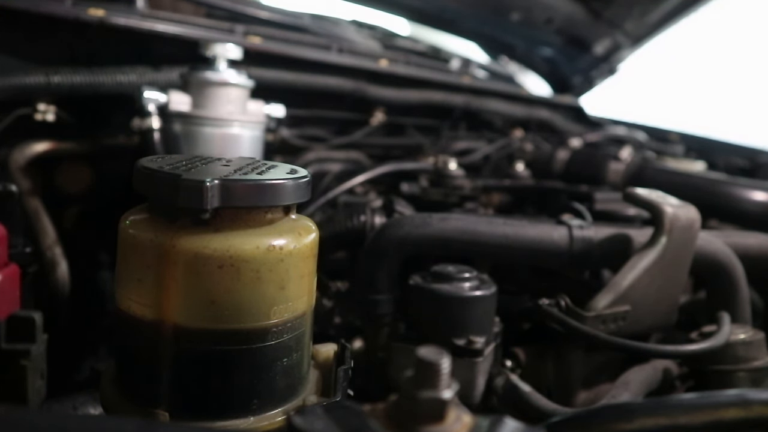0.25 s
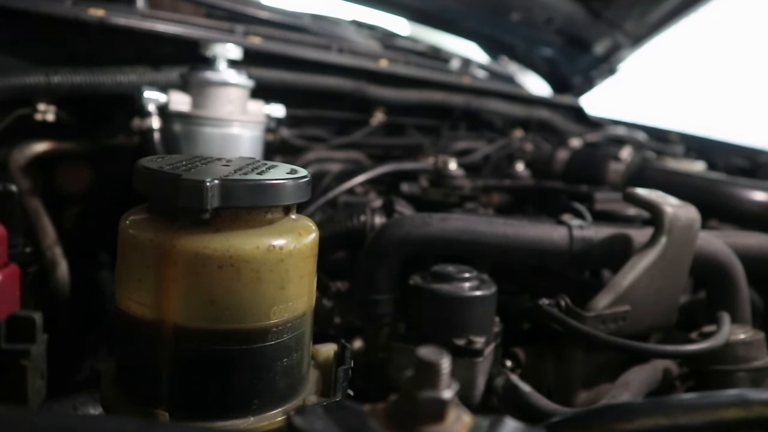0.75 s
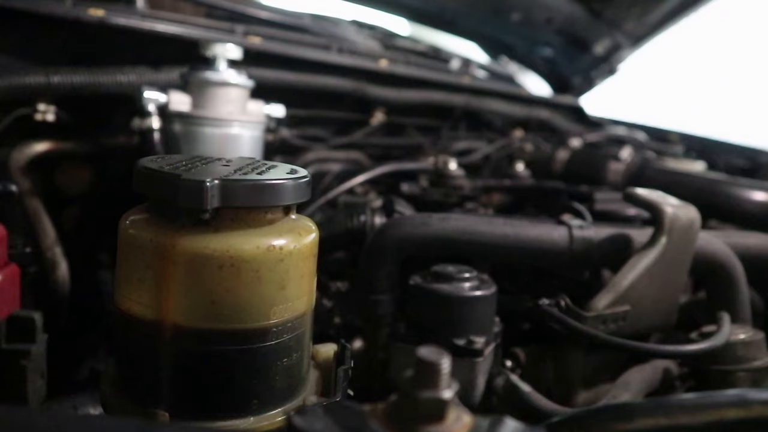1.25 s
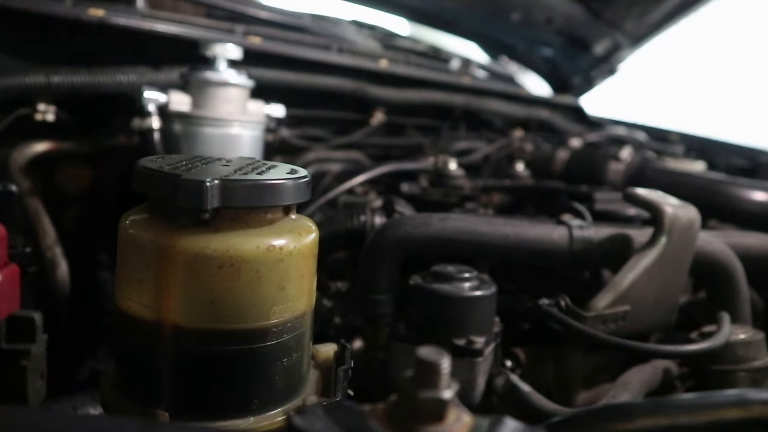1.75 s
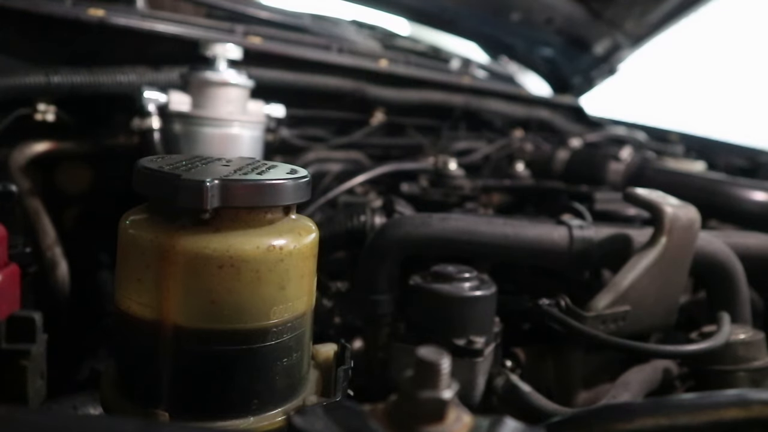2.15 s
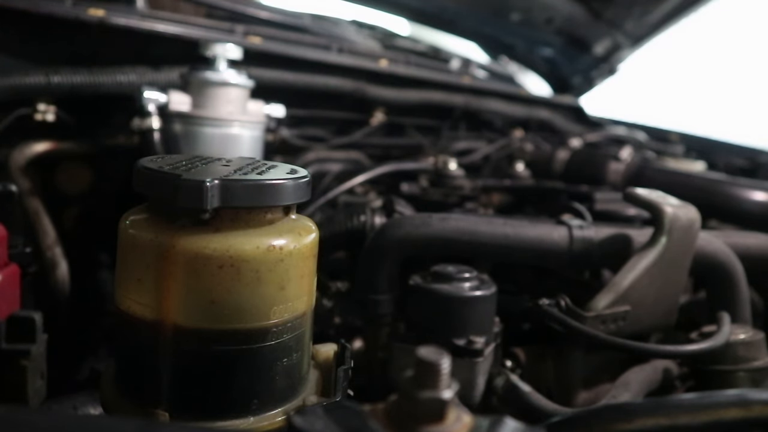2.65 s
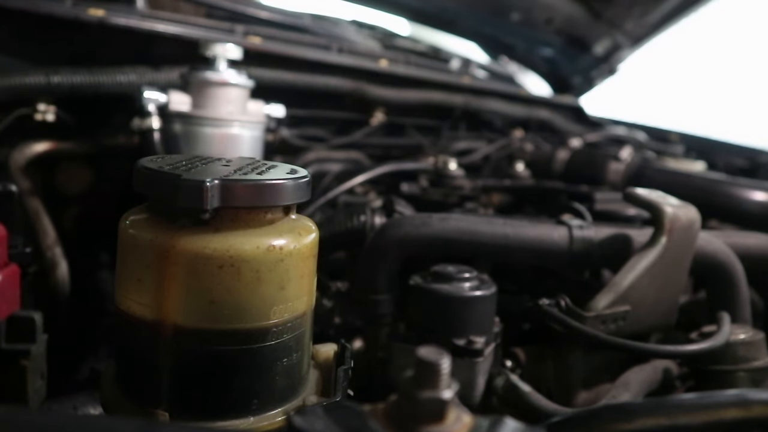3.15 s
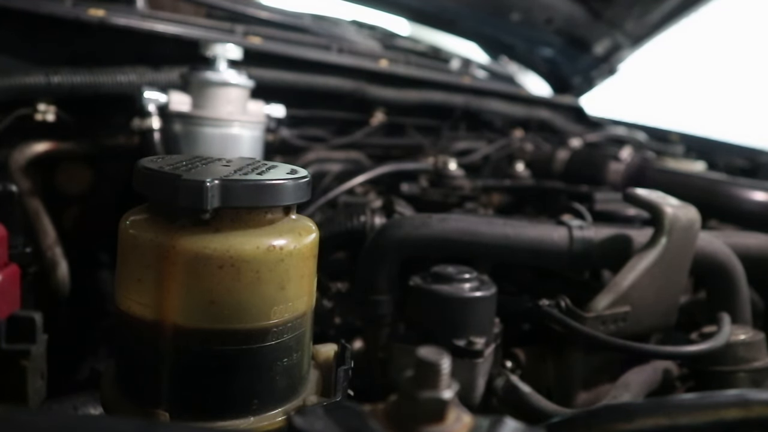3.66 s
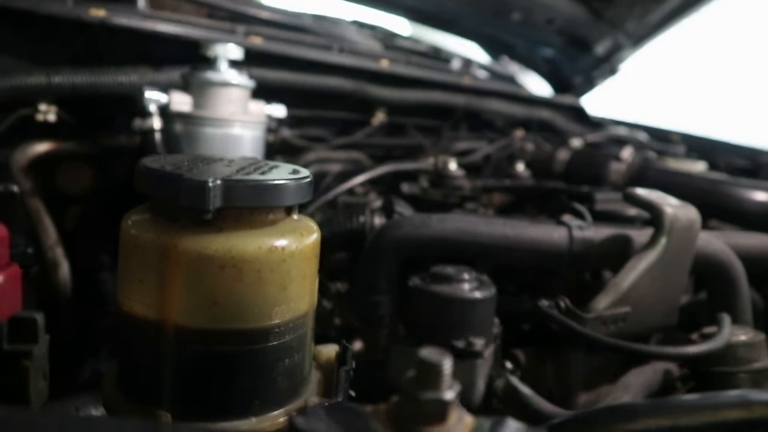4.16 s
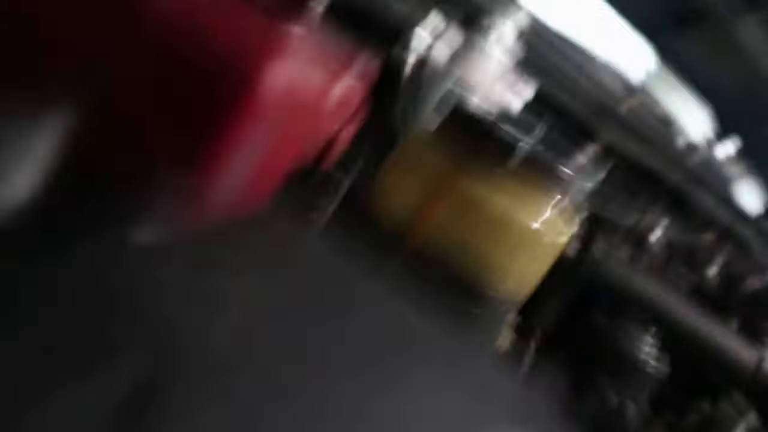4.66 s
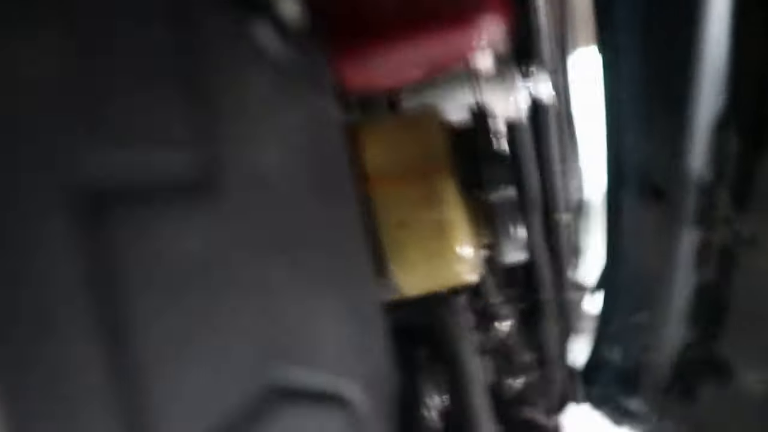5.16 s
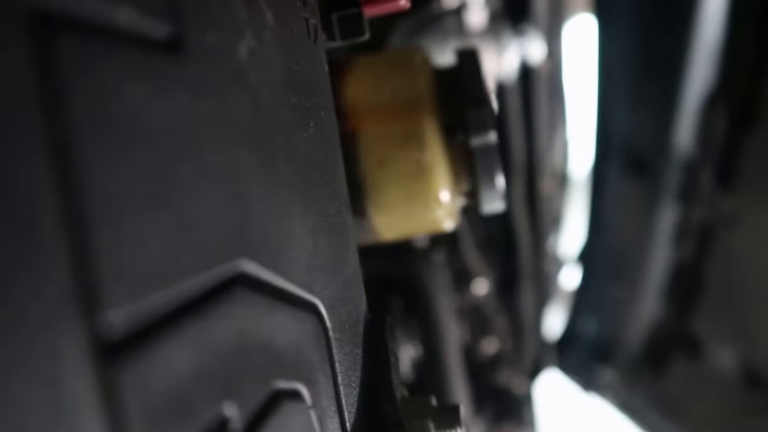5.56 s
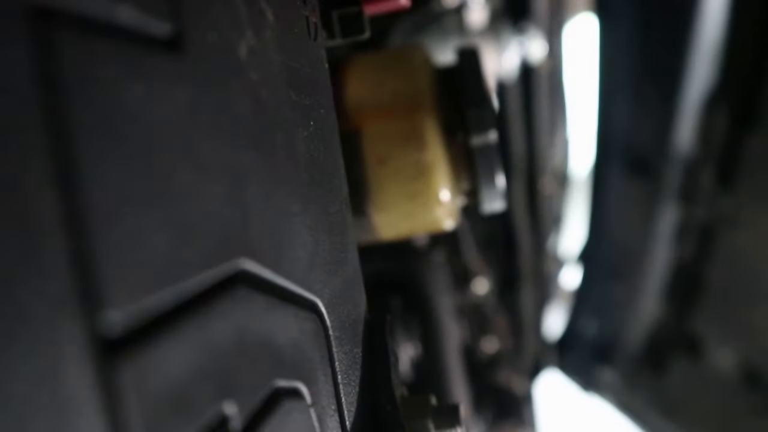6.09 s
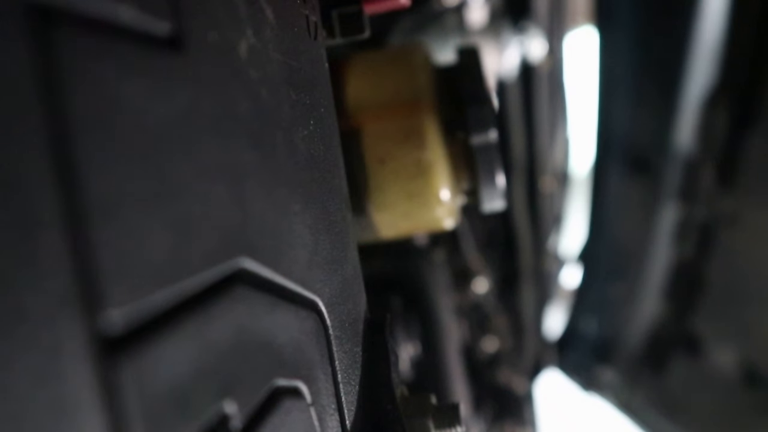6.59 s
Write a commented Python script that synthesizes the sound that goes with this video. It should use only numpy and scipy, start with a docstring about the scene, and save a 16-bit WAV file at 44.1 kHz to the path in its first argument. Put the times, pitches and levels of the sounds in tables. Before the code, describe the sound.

Close stereo microphone under a raised bonnet in a breeze: soft rustle, dry clack, two short buzzing rattles, a hard wind thump. Then gear teeth clash and a whining starter labours through ten compressions. The microphone is swung with hollow knocks, sound dips, and rattling diesel firing with a low drone grows steadily to the end.

```python
"""Outdoors, under an open bonnet, a four-cylinder diesel is started while a breeze puffs on the microphone.
Ignition actuators clack as bursts of micro-impacts; the starter's gear teeth grind through ten compressions.
The engine catches; the microphone's case is knocked as it is swung round, and the level sinks.
Then the idle swells up: blows at each firing excite the block, over a drone on multiples of the firing rate.
Noise-like sources are random impacts shaped by a body's spectrum and resonances; whines are wavering sines."""
import sys
import numpy as np
from scipy import signal
from scipy.fft import rfft, irfft
from scipy.io import wavfile
from scipy.ndimage import uniform_filter1d

SR = 44100
rng = np.random.default_rng(int(sys.argv[2]) if len(sys.argv) > 2 else 0)


def transcribe(u):
    """Save the signal u as a 16-bit wav file named by the first command-line argument.

    u: samples, shape (n,) or (channels, n), limited to [-1, 1]; the rate is SR.
    q: integer samples, one column per channel.
    """
    v = np.clip(np.atleast_2d(u).T, -1, 1)
    q = np.round(v * 32767).astype(np.int16)
    wavfile.write(sys.argv[1], SR, q)


N = 301203

# Every *_COLOUR is a relative spectral density: (frequency [Hz], density [dB per Hz])
# Every *_MODES is a set of resonances: (frequency [Hz], width [Hz], height above the colour [dB])
# Levels within a source are relative where that source adds its own gain.

# stereo width before each source's offset: (frequency [Hz], side minus mid [dB])
STEREO_WIDTH = [(100, -86), (650, -49.5), (1290, -26.5), (2380, -9.5), (4400, -3), (8000, 3.5),
                (11000, 8.5), (15000, 16.5)]
CUTOFF_HZ = 15900

# outdoor hiss: (time [s], level [dB])
AIR_LEVEL = [(0, -34), (.7, -33.5), (1.0, -32.5), (1.3, -33), (3.1, -33.5), (4.9, -34), (5.03, -43.5),
             (5.4, -45.5), (6.83, -48)]
# spectrum of the hiss: (frequency [Hz], density [dB per Hz])
AIR_COLOUR = [(25, -26), (70, -4), (250, -3), (520, -4), (700, -3.5), (1100, -2), (1700, -2), (2900, -4.5),
              (4000, -10), (7000, -22), (10000, -29), (14000, -62)]
# faint hums in the hiss: (frequency [Hz], width [Hz], height [dB])
AIR_MODES = [(521, 20, 13.4), (796, 10.6, 11), (1085, 35, 5.3)]
# thin whine: (time [s], level [dB])
WHINE_LEVEL = [(.55, -69.5), (.72, -44.5), (1.05, -47), (1.25, -75)]

# gusts of wind on the microphone: (time [s], level [dB], hold [s])
GUSTS = [(0, -32.5, 0.049), (1.23, -39, 0.18), (1.532, -36, 0.46), (2.066, -28.5, 0.1), (2.479, -32, 0.13),
         (2.795, -33, 0.16), (3.267, -32.5, 0.22), (4.707, -34, 0.055)]
GUST_RISE_S, GUST_DECAY_S = 0.01, 0.12
# the hardest eddies: (time [s], level [dB], half length [s])
EDDIES = [(0.01, -25.5, 0.031), (0.107, -25, 0.0094), (1.185, -19, 0.013), (1.222, -22, 0.016),
          (1.707, -24, 0.011), (1.825, -19.5, 0.012), (1.864, -19.5, 0.012), (1.947, -20, 0.017),
          (2.26, -21, 0.005), (2.323, -21, 0.0042), (2.645, -23.5, 0.013), (2.775, -11.5, 0.01),
          (2.869, -16.5, 0.011), (3.303, -25, 0.009), (3.35, -26, 0.009), (3.405, -28, 0.012),
          (3.497, -24, 0.012)]
# spectrum of the turbulence: (frequency [Hz], density [dB per Hz])
WIND_COLOUR = [(20, -66), (45, -9), (90, 3.5), (160, 5.5), (300, 2.5), (700, -0.5), (2000, -5)]

# soft rustle before the first clack: (time [s], level [dB])
RUSTLE_LEVEL = [(.8, -67), (.95, -32.5), (1.03, -40), (1.12, -69)]
# spectrum of the rustle: (frequency [Hz], density [dB per Hz])
RUSTLE_COLOUR = [(110, -27), (300, -3), (520, -1), (800, -19), (1500, -3), (3000, -19), (7500, -26),
                 (13000, -58)]
# relay and flap of the ignition: (time [s], relative level [dB], hold [s], decay [s])
RELAY_CLACKS = [(1.1301, -16, 0.0046, 0.0055), (1.134, -14.5, .002, 0.0082), (1.142, -21.5, 0.0022, 0.0069),
                (1.1493, -20.5, 0.0034, 0.007), (1.16, -21.5, 0.0029, 0.016)]
# spectrum of relay and flap: (frequency [Hz], density [dB per Hz])
RELAY_COLOUR = [(300, -7.5), (500, -4), (1000, 5), (1290, -6), (1750, 0.5), (2700, 0), (3700, -10),
                (5300, -6), (9500, -12), (15000, -44)]
# resonances of relay and flap: (frequency [Hz], width [Hz], height [dB])
RELAY_MODES = [(380, 200, 8.5), (2750, 130, 3), (5350, 130, 6.5)]
# valve rattling on its stop: (time [s], level [dB])
VALVE_RATTLES = [(1.4215, -23), (1.6776, -23)]
VALVE_HOLD_S, VALVE_DECAY_S = 0.016, 0.015
# spectrum of the valve: (frequency [Hz], density [dB per Hz])
VALVE_COLOUR = [(300, -36), (580, 5.5), (850, -11), (1450, 10.5), (2300, -3), (3300, -6.5), (4150, -0.5),
                (4700, -13), (8000, -11), (12000, -16), (15000, -43)]
# resonances of the valve: (frequency [Hz], width [Hz], height [dB])
VALVE_MODES = [(580, 22, 15), (4060, 330, 6.5)]

# knocks on the microphone's case: (time [s], thud level [dB], tick level [dB], thud decay [s]), levels relative
CASE_KNOCKS = [(4.808, -10.5, -23.5, .003), (4.911, 5.5, -4, 0.002), (4.9202, -5.5, -12.5, 0.0017),
               (4.9268, -6, -18, 0.007), (4.96, -16, -45, 0.011), (4.9811, -16.5, -35, 0.022),
               (5.1424, -8.5, -9.5, 0.0019), (5.159, -18, -17.5, 0.0027), (5.233, -26, -39, .003),
               (5.2742, -26.5, -30.5, .008), (5.306, -24, -33, 0.0024), (5.336, -29, -50, .004)]
# spectrum of the hollow thuds: (frequency [Hz], density [dB per Hz])
THUD_COLOUR = [(40, -13), (200, -1), (550, 3), (800, 8), (1050, 10.5), (1400, 4.5), (1800, 6.5),
               (2400, -11), (6000, -52)]
# spectrum of the sharp ticks: (frequency [Hz], density [dB per Hz])
TICK_COLOUR = [(1000, -41), (2500, 3), (3800, 2), (5300, 7.5), (7000, -5), (11000, -9.5), (15500, -30)]
# small dry ticks: (time [s], level [dB])
DRY_TICKS = [(.9885, -38), (5.2325, -31), (5.2772, -30.5), (5.307, -43)]
# spectrum of the dry ticks: (frequency [Hz], density [dB per Hz])
DRY_TICK_COLOUR = [(3000, -20), (8500, 14), (15000, -27)]
# fingers sliding on the case: (time [s], level [dB])
SLIDE_LEVEL = [(5.29, -60), (5.33, -44), (5.41, -55), (5.49, -47), (5.55, -61)]
# spectrum of the slide: (frequency [Hz], density [dB per Hz])
SLIDE_COLOUR = [(3000, -8), (7000, -5), (7900, -2), (8800, -9), (15500, -37)]

# pinion crashing into the ring gear: (time [s], relative level [dB], hold [s], relative treble level [dB])
CLASHES = [(3.546, -33, 0.004, -22), (3.5525, -14, 0.025, -20.5), (3.5778, -14.5, 0.005, -10),
           (3.6, -10, 0.0032, -23), (3.71, -17, 0.0088, -21)]
# compressions forced by the starter: (time [s], relative level [dB], hold [s], relative treble level [dB])
STROKES = [(3.789, -18, 0.09, -26), (3.962, -16.5, 0.043, -23.5), (4.079, -15, 0.034, -22.5),
           (4.193, -14, 0.04, -24.5), (4.303, -15, 0.03, -21), (4.409, -14.5, 0.033, -22),
           (4.52, -12, 0.027, -21.5), (4.623, -14, 0.039, -24.5), (4.73, -15, 0.048, -22.5),
           (4.84, -13.5, 0.044, -24.5)]
# teeth running between surges: (time [s], relative level [dB])
GEARS_LEVEL = [(3.54, -81), (3.56, -24), (3.68, -18), (3.78, -31), (4.0, -24.5), (4.5, -19.5),
               (4.93, -26.5), (5.0, -22), (5.06, -67)]
# spectrum of the loaded bell housing: (frequency [Hz], density [dB per Hz])
HOUSING_COLOUR = [(40, -35), (100, -33), (250, -4.5), (550, -1), (800, 4), (1080, -1), (1450, 2.5),
                  (1900, -4.5), (2300, -11.5), (2800, -5), (3600, -12), (6000, -21), (10000, -33.5),
                  (15000, -78)]
# ringing of the bell housing: (frequency [Hz], width [Hz], height [dB])
HOUSING_MODES = [(1018, 16, 8), (1178, 20, 7.5), (1238, 20, 8), (1329, 18, 6), (1437, 42, 6), (1625, 36, 5),
                 (2890, 60, 3), (3171, 60, 3.5), (4268, 40, 6), (4469, 54, 4)]
# spectrum of the bright grinding: (frequency [Hz], density [dB per Hz])
GRIND_COLOUR = [(900, -31), (1800, 12.5), (2800, 5.5), (3600, 1.5), (4300, 2), (5500, -1.5), (7500, -5.5),
                (10000, -9), (13000, -21.5), (15500, -66)]
# squeaks of the starter: (time [s], relative level [dB], hold [s], decay [s])
SQUEAKS = [(4.052, -30, 0.022, 0.012)]
# nominal tooth rate: on engaging, running free, at the start of each compression
ENGAGE_HZ, FREE_HZ, MESH_HZ = 720, 770, 795
# share of speed lost to a compression before smoothing; share of the stroke at which it is slowest
SAG_SHARE, SLOWEST_SHARE = .105, .6
PINION_TEETH = 10
# whine of the loaded teeth: (multiple of the tooth rate, level against the load [dB], lag behind the load [s])
GEAR_WHINE = [(1, -11, 0.0013), (2, -12.5, 0.023)]

# reference loudness of the running engine: (time [s], level [dB])
IDLE_LEVEL = [(5.0, -42), (5.06, -32.5), (5.095, -35), (5.2, -42), (5.3, -44), (5.39, -44), (5.55, -38),
              (5.8, -33), (6.1, -30), (6.83, -27.5)]
# engine speed once it has caught: (time [s], rate [firings per s])
FIRING_RATE = [(5.336, 25.96), (5.53, 31.01), (5.98, 30.79), (6.4, 28.42), (6.83, 26.34)]
CATCH_S = 5.0648
DRONE_START_S, DRONE_RISE_S = 5.46, 0.018
DRONE_DB = -11.5  # against the engine's loudness
# mean strengths in the intake drone: (multiple of the firing rate, relative level [dB])
INTAKE_ORDERS = [(3, -17), (4, -7), (5, 0), (7, -12)]
# offsets of the cylinders in firing order: (knock [dB], second clack [dB], injector [dB])
CYLINDERS = [(-2, -3, 0), (2.5, 3.5, 1), (1, 0.5, 0), (-3.5, -3, 0.5)]
KNOCK_DB, SLAP_DB = 9.0, 5.5  # combustion knock and second clack against the loudness, before cylinder offsets
# loose parts rattling after each blow, level against the blow
RATTLE_DB, RATTLE_HOLD_S, RATTLE_DECAY_S = -6.0, .003, .0035
# spectrum of the struck block: (frequency [Hz], density [dB per Hz])
BLOCK_COLOUR = [(300, -36), (800, -4.5), (1400, -1), (2200, -7.5), (3000, -23), (3700, -20.5), (4500, -34),
                (9000, -42), (15000, -73)]
# broad ring of the block: (frequency [Hz], width [Hz], height [dB])
BLOCK_MODES = [(1410, 110, 11), (1570, 110, 6)]
# spectrum of the injectors: (frequency [Hz], density [dB per Hz])
INJECTOR_COLOUR = [(1500, -6.5), (2500, 10.5), (3600, 9), (4400, -7), (5500, -1), (6800, -1.5),
                   (8000, -7.5), (11000, -9.5), (15000, -44)]
# resonances of the injectors: (frequency [Hz], width [Hz], height [dB])
INJECTOR_MODES = [(5650, 260, 5), (6840, 400, 4)]
# spectrum of the running gear: (frequency [Hz], density [dB per Hz])
RUNNING_COLOUR = [(50, -71), (115, -12), (260, -4.5), (470, 1), (850, -2), (1100, -3.5), (1400, -1),
                  (2200, -10), (3600, -15), (4500, -22.5), (10500, -32.5), (15000, -56)]
# the block humming on between firings: (frequency [Hz], width [Hz], height [dB])
RUNNING_MODES = [(1340, 150, 4)]


def from_db(db):
    """Logarithmic scale: twenty decibels are a tenfold amplitude."""
    return 10 ** (np.asarray(db) / 20)


def in_time(rows):
    """Linear interpolation: each column of a curve at every sample."""
    s, *columns = np.transpose(rows)
    return [np.interp(np.arange(N) / SR, s, column) for column in columns]


def level(rows):
    """Envelope: a dB curve as amplitude gain at every sample."""
    return from_db(in_time(rows)[0])


def at_hz(points, hz):
    """Spectral envelope: dB interpolated on a log-frequency axis."""
    f, db = np.transpose(points)
    return np.interp(np.log(hz + 1), np.log(f), db)


def causal_filter(x, gain):
    """Minimum phase: a body with this gain per frequency rings only after it is excited."""
    cepstrum = irfft(np.log(gain + 1e-7))
    half = len(cepstrum) // 2
    # folding the cepstrum onto positive time gives minimum phase
    cepstrum[1:half] *= 2
    cepstrum[half + 1:] = 0
    impulse_response = irfft(np.exp(rfft(cepstrum)))
    return signal.fftconvolve(x, impulse_response)[:N]


def drift(rate, count=4000):
    """Low-passed noise: smooth chance with spread 1, changing about `rate` times a second."""
    pole = np.exp(-2 * np.pi * rate * 20 / SR)
    noise = rng.standard_normal(N // 20 + 2 + count)
    slow = signal.lfilter([1], [1, -2 * pole, pole * pole], noise)[count:]  # drop the settling time
    return np.interp(np.arange(N) / 20, np.arange(len(slow)), slow / slow.std())


def radiate(force, colour, modes=(), blows=0., grain_db=0., width_db=0., size=8192):
    """Source and resonator: micro-impacts of rms `force` and single blows excite a body, in stereo."""
    hz = np.arange(size // 2 + 1) * SR / size
    gain = from_db(at_hz(colour, hz))
    for centre, width, db in modes:
        resonance = (from_db(db) ** 2 - 1) / (1 + (2 * (hz - centre) / width) ** 2)
        gain = gain * np.sqrt(1 + resonance)
    gain = gain / np.sqrt(np.mean(gain ** 2))
    grains = from_db(grain_db * drift(260))
    grains = grains / np.sqrt(np.mean(grains ** 2))
    impacts = force * grains * rng.standard_normal((2, N))
    side_gain = gain * from_db(at_hz(STEREO_WIDTH, hz) + width_db)
    mid = causal_filter(impacts[0] + blows, gain)
    side = causal_filter(impacts[1] + blows * rng.choice([-1, 1], N), side_gain)
    return np.array([mid + side, mid - side])


def bursts(rows, rise):
    """Addition of powers: bursts (time [s], level [dB], hold [s], decay [s]) rise, hold and die away."""
    power = np.zeros(N)
    for s, db, hold, decay in rows:
        start = int(s * SR)
        t = np.arange(min(int((rise + hold + 10 * decay) * SR), N - start)) / SR
        fall = np.exp(-np.maximum(t - hold, 0) / decay)
        power[start:start + len(t)] += (from_db(db) * np.minimum(t / rise, 1) * fall) ** 2
    return np.sqrt(power)


def clicks(rows):
    """Impulse: each blow (time [s], level [dB]) has the energy of a millisecond at that level."""
    out = np.zeros(N)
    for s, db in rows:
        out[int(s * SR)] += from_db(db) * np.sqrt(SR / 1000)
    return out


def tone(hz, waver_hz):
    """Frequency modulation: a sine of rms 1 whose pitch wavers."""
    cycles = np.cumsum(hz + waver_hz * drift(9.0)) / SR
    return np.sqrt(2) * np.sin(2 * np.pi * cycles)


def outdoors(whine_hz=2010):
    """Broadband noise with weak resonances: even hiss, the hums of distant machinery and a thin whine."""
    hiss = radiate(level(AIR_LEVEL), AIR_COLOUR, AIR_MODES, grain_db=0.5, width_db=1.5)
    return hiss + level(WHINE_LEVEL) * tone(whine_hz, waver_hz=8.5)


def wind(soft_db=-27, soft_top_hz=330, db_per_octave=14, gust_top_hz=320,
         lumpy_db=3.0, lumps_per_s=22, eddy_span=5.7):
    """Turbulence: gusts are lumpy and low; a hard eddy is one short lump, and harder ones reach higher."""
    turbulence = radiate(1, WIND_COLOUR, width_db=34.0)
    low_pass = signal.butter(4, gust_top_hz, fs=SR, output="sos")
    rumble = signal.sosfilt(low_pass, turbulence) * from_db(lumpy_db * drift(lumps_per_s))
    gusts = bursts([(s, db, hold, GUST_DECAY_S) for s, db, hold in GUSTS], rise=GUST_RISE_S)
    out = gusts * rumble / rumble.std()
    for s, db, half in EDDIES:
        span = np.arange(max(int((s - 4 * half) * SR), 0), int((s + 4 * half) * SR))
        swell = 1 / np.cosh((span / SR - s) / half * np.pi / 2)
        top_hz = soft_top_hz * 2 ** (max(db - soft_db, 0) / db_per_octave)
        band_pass = signal.butter(3, [top_hz / eddy_span, top_hz], "band", fs=SR, output="sos")
        eddy = swell * signal.sosfilt(band_pass, turbulence[:, span])
        out[:, span] += from_db(db) * eddy * np.sqrt(np.mean(swell ** 2) / np.mean(eddy ** 2))
    return out


def ignition(snap_db=-11.0, chatter_db=-2.5):
    """Impact and rebound: after a rustle a relay and flap clack and bounce; a valve rattles on its stop twice."""
    rustle = radiate(level(RUSTLE_LEVEL), RUSTLE_COLOUR, grain_db=-2.0)
    snaps = clicks([(s + 0.0014, db + snap_db) for s, db, hold, decay in RELAY_CLACKS])
    chatter = from_db(chatter_db) * bursts(RELAY_CLACKS, rise=0.00088)
    relay = radiate(chatter, RELAY_COLOUR, RELAY_MODES, snaps, grain_db=2.0, width_db=1.0)
    # the valve meets its stop at both ends of each rattle
    stops = clicks([(s + late, db - 10) for s, db in VALVE_RATTLES for late in (.001, VALVE_HOLD_S)])
    rattle = bursts([(s, db, VALVE_HOLD_S, VALVE_DECAY_S) for s, db in VALVE_RATTLES], rise=0.0012)
    valve = radiate(rattle, VALVE_COLOUR, VALVE_MODES, stops, grain_db=2.0, width_db=-3.0)
    return rustle + relay + valve


def handling(tick_decay=0.0014, scuff_db=-38, scuff_hold=0.0099, scuff_decay=0.015, blow_db=0.0, buzz_db=-5.0):
    """Contact and friction: each knock on the case ticks, thuds and scuffs; dry ticks and a finger slide join."""
    blows = clicks([(s + .0003, db + blow_db) for s, db, tick, decay in CASE_KNOCKS])
    thuds = bursts([(s, db + buzz_db, .001, decay) for s, db, tick, decay in CASE_KNOCKS], rise=.0001)
    ticks = bursts([(s, tick, .0006, tick_decay) for s, db, tick, decay in CASE_KNOCKS], rise=.0001)
    scuffs = bursts([(s, scuff_db, scuff_hold, scuff_decay) for s, *_ in CASE_KNOCKS], rise=.002)
    hollow = radiate(np.hypot(thuds, scuffs), THUD_COLOUR, blows=blows, width_db=6.5)
    sharp = radiate(ticks, TICK_COLOUR, width_db=1.5)
    dry_ticks = radiate(0, DRY_TICK_COLOUR, blows=clicks(DRY_TICKS), width_db=-1.0)
    slide = radiate(level(SLIDE_LEVEL), SLIDE_COLOUR, grain_db=2.0)
    return hollow + sharp + dry_ticks + slide


def mesh_rate(lag=0.0046):
    """Load torque: the starter spins up, is dragged down by each compression and recovers before the next."""
    starts = np.array(STROKES)[:, 0] + lag
    lengths = np.gradient(starts)
    tops = [(GEARS_LEVEL[0][0], ENGAGE_HZ), (starts[0], FREE_HZ)]
    tops += [(s, MESH_HZ) for s in [*starts[1:], starts[-1] + lengths[-1]]]
    dips = [(s, MESH_HZ * (1 - SAG_SHARE)) for s in starts + SLOWEST_SHARE * lengths]
    return uniform_filter1d(in_time(sorted(tops + dips))[0], size=600)


def gear_mesh(uneven=.45, wobble=.6, flutter=.012):
    """Periodic impact, rms 1: one blow per tooth; the pinion runs out of true, so blows swell once a turn."""
    teeth = np.cumsum(mesh_rate() * (1 + flutter * drift(60))) / SR
    run_out = wobble * np.sin(2 * np.pi * teeth / PINION_TEETH)
    strength = 1 + run_out + uneven * rng.standard_normal(N)
    impacts = np.diff(np.floor(teeth), prepend=0) * strength
    return (impacts - impacts.mean()) / impacts.std()


def gear_whine(decay):
    """Harmonics of meshing: loaded teeth sing on the tooth rate and its octave, following the speed."""
    t, rate = np.arange(N) / SR, mesh_rate()
    load = bursts([(s, db, hold, decay) for s, db, hold, treble in STROKES], rise=.003)
    out = np.zeros(N)
    for k, db, lag in GEAR_WHINE:
        unsteady = tone(k * rate, waver_hz=9) * from_db(2.5 * drift(40))
        out += from_db(db) * np.interp(t - lag, t, load) * unsteady
    return out


def shifting(x, modes, depth_db, rate, spread=2):
    """Modal excitation: the contact point moves, so each resonance comes and goes on its own."""
    for centre, width, db in modes:
        band = signal.lfilter(*signal.iirpeak(centre, centre / (spread * width), fs=SR), x)
        swing = from_db(depth_db * np.clip(drift(rate), -2, 2))
        x = x + band * (swing / np.sqrt(np.mean(swing ** 2)) - 1)
    return x


def starter(squeak_hz=3160, load_decay=0.02, grind_decay=0.048, clash_decay=0.037,
            take_up_db=0.0, rattle_db=-4.0, grind_db=-3.5):
    """Gear backlash: each surge takes it up with a clack; loaded teeth whine, rattle the housing and grind."""
    surges = bursts([(s, db, hold, load_decay) for s, db, hold, treble in CLASHES + STROKES], rise=.003)
    load = from_db(rattle_db) * np.hypot(surges, level(GEARS_LEVEL))
    stroke_grind = bursts([(s, treble, hold, grind_decay) for s, db, hold, treble in STROKES], rise=0.0016)
    clash_grind = bursts([(s, treble, hold, clash_decay) for s, db, hold, treble in CLASHES], rise=0.0013)
    grind = from_db(grind_db) * np.hypot(stroke_grind, clash_grind)
    take_up = clicks([(s + 0.00187, db + take_up_db) for s, db, hold, treble in CLASHES + STROKES])
    teeth = from_db(-7) * gear_mesh()
    squeak = bursts(SQUEAKS, rise=0.0049) * tone(squeak_hz, waver_hz=40) * from_db(3 * drift(150))
    housing = radiate(load, HOUSING_COLOUR, HOUSING_MODES, take_up + load * teeth, grain_db=0.5, width_db=-0.5)
    grinding = radiate(grind, GRIND_COLOUR, blows=grind * teeth, grain_db=0.5, width_db=-1.0)
    body = shifting(housing + grinding, HOUSING_MODES, depth_db=3, rate=14)
    return body + gear_whine(load_decay) + squeak


def firing_count():
    """Integration of speed: firings since the engine caught, at every sample."""
    turned = np.cumsum(in_time(FIRING_RATE)[0]) / SR
    return turned - turned[int(CATCH_S * SR)]


def firings(jitter_s=.0004, uneven_db=1.5):
    """Cyclic variation: firings come a little unevenly, as rows (time [s], level [dB])."""
    count = firing_count()
    k = np.arange(int(count[-1]) + 1)
    s = np.searchsorted(count, k) / SR
    late, hard = rng.standard_normal((len(k), 2)).T
    loudness = np.interp(s, *np.transpose(IDLE_LEVEL))
    return list(zip(s + jitter_s * late, loudness + uneven_db * hard))


def intake():
    """Harmonic series: the intake duct drones unevenly on low multiples of the firing rate."""
    phase = 2 * np.pi * firing_count()
    onset = np.clip((np.arange(N) / SR - DRONE_START_S) / DRONE_RISE_S, 0, 1)
    orders = np.zeros(N)
    for k, db in INTAKE_ORDERS:
        orders += from_db(db + 4 * drift(12)) * np.sin(k * phase + .5 * drift(12))
    return from_db(DRONE_DB) * level(IDLE_LEVEL) * onset * orders


def engine(slap_delay=.012, injector_db=-6.5, running_db=0.6, lead=0.0031):
    """Impulsive excitation: injectors tick, combustion knocks, a clack follows; belts, fan and valves run on."""
    fired = firings()
    chance = rng.standard_normal((len(fired), 3))
    knocks, slaps, needles = [], [], []
    for k, ((s, db), (late, hard, sharp)) in enumerate(zip(fired, chance)):
        knock, slap, needle = CYLINDERS[k % len(CYLINDERS)]
        knocks.append((s + .001, db + KNOCK_DB + knock))
        slaps.append((s + slap_delay + late / 2000, db + SLAP_DB + slap + hard / 2))
        needles.append((s - lead, db + injector_db + needle + sharp))
    loose = [(s, db + RATTLE_DB, RATTLE_HOLD_S, RATTLE_DECAY_S) for s, db in knocks + slaps]
    rattle = bursts(loose, rise=0.00074)
    ticks = bursts([(s, db, .004, .008) for s, db in needles], rise=0.0015)
    block = radiate(rattle, BLOCK_COLOUR, BLOCK_MODES, clicks(knocks + slaps), width_db=9.5)
    injectors = radiate(ticks, INJECTOR_COLOUR, INJECTOR_MODES, grain_db=1.0, width_db=-7.0)
    started = np.arange(N) / SR > IDLE_LEVEL[0][0]
    running = from_db(running_db) * level(IDLE_LEVEL) * started
    return block + injectors + radiate(running, RUNNING_COLOUR, RUNNING_MODES, width_db=0.0)


def scene():
    """Superposition: everything heard at the edge of the engine bay."""
    return outdoors() + wind() + ignition() + handling() + starter() + intake() + engine()


def record(dry):
    """Overload and band limit: the loudest peaks clip, then a steep low-pass cuts the top."""
    low_pass = signal.ellip(10, .1, 80, CUTOFF_HZ, fs=SR, output="sos")
    return signal.sosfilt(low_pass, np.clip(dry, -1, 1))


dry = scene()
out = record(dry)
transcribe(out)
```